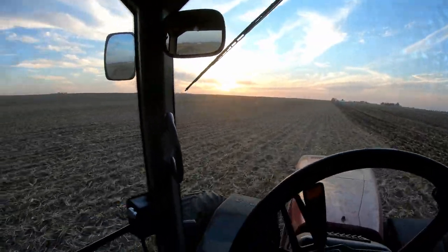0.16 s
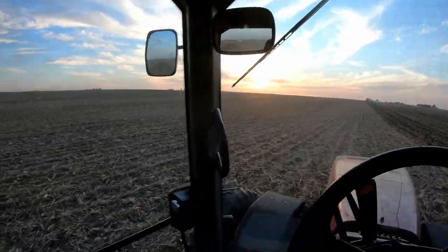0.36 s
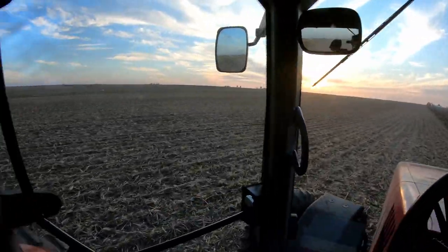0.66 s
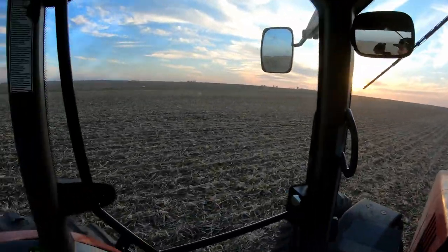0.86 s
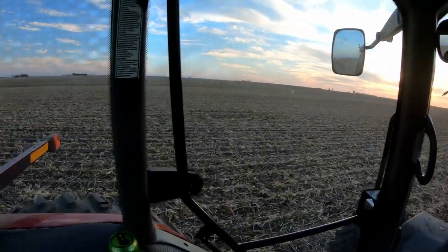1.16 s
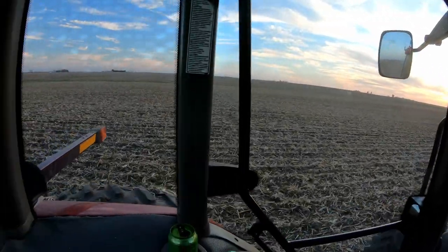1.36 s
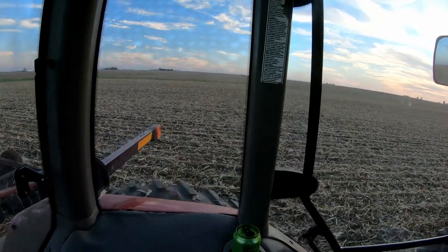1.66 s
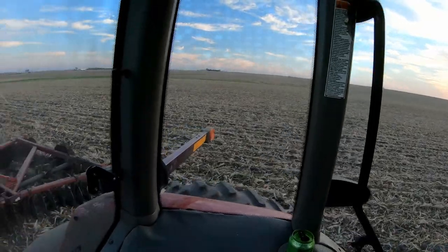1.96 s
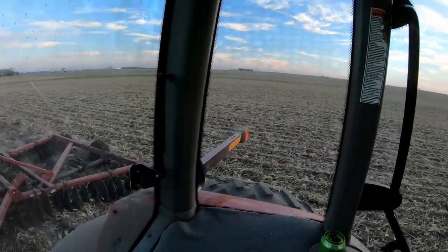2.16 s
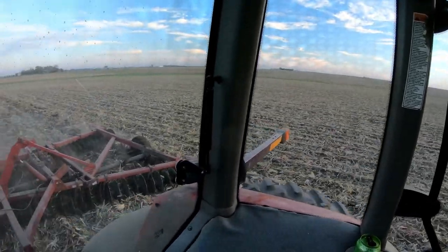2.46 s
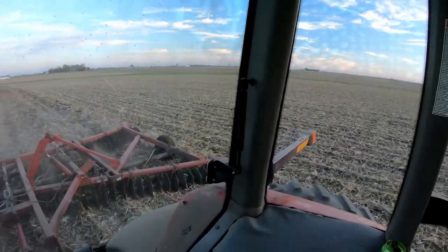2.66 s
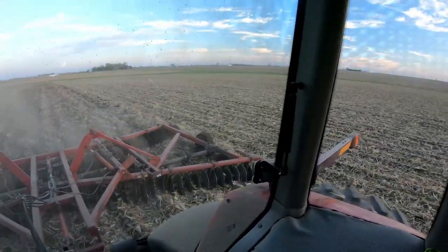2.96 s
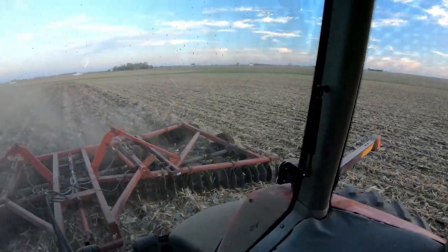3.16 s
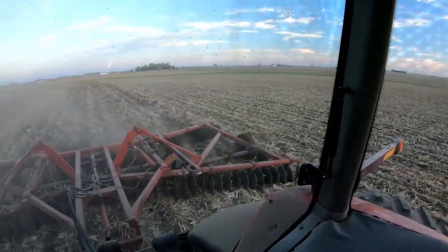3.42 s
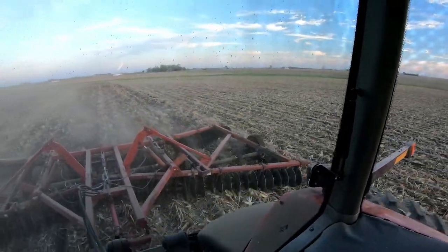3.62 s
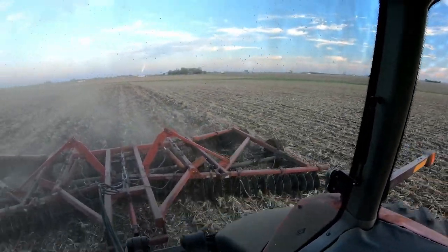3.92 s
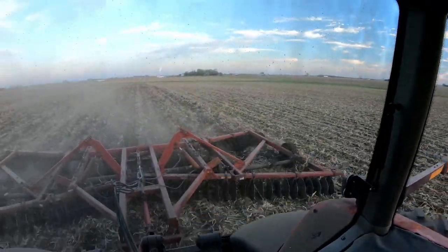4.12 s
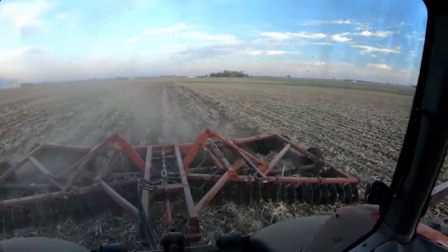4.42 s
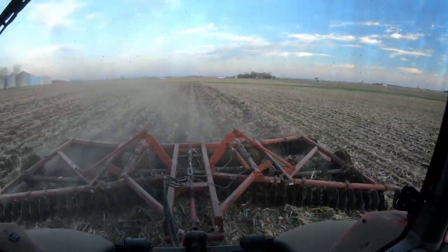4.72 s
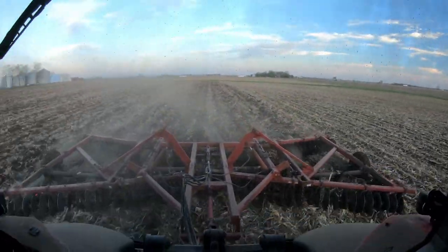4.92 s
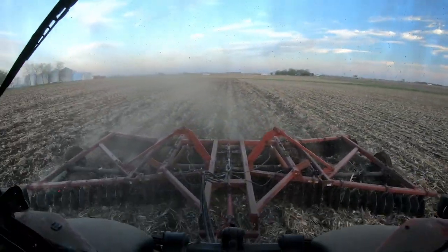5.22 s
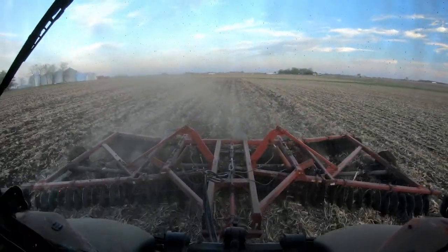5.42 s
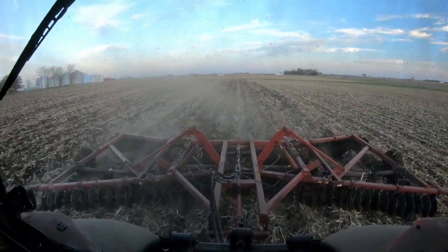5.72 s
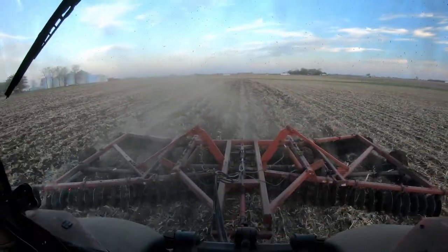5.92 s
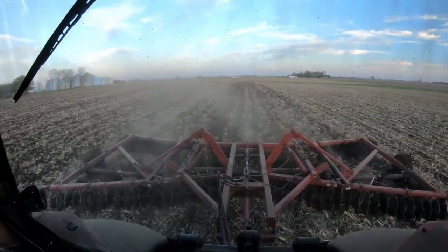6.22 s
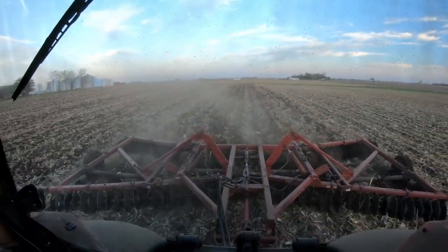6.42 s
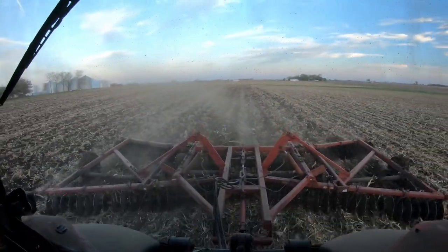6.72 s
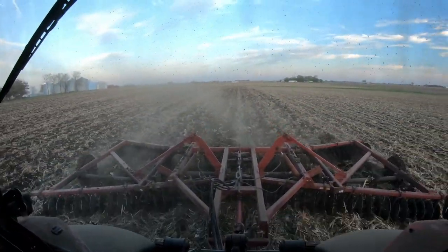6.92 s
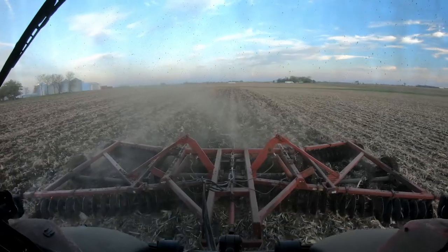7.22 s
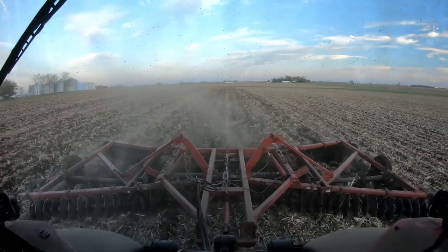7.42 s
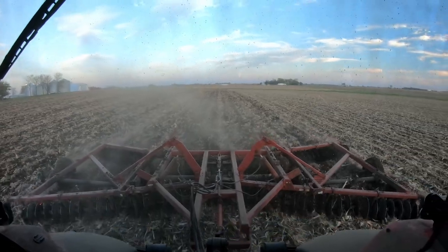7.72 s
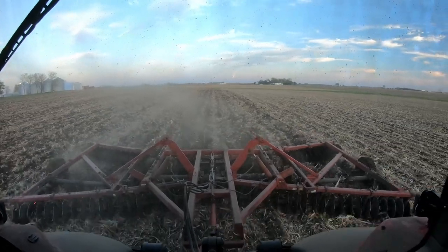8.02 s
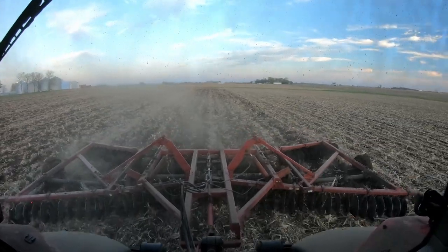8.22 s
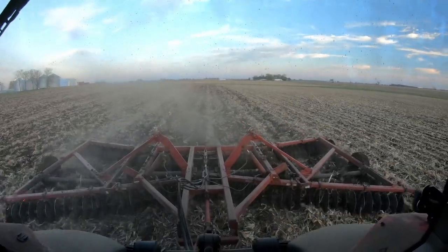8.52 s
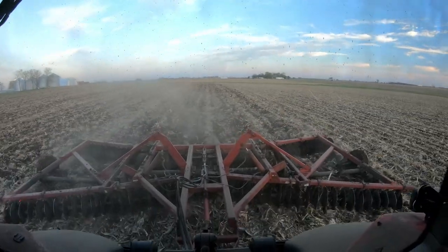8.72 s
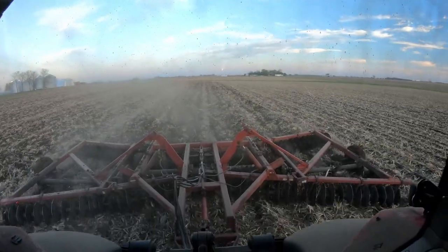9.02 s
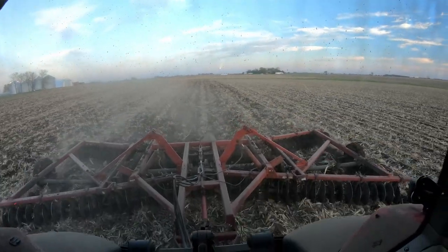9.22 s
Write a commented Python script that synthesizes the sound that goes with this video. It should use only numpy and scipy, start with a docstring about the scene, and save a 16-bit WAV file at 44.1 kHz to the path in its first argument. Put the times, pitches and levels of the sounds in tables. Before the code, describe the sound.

Inside a closed tractor cab, a diesel engine drones at steady speed while pulling a harrow over rough ground. Gears whine above muffled clatter and a low rumble. A loose fitting clacks sharply twice early on and once more later. The deep boom swells as the microphone turns from the windscreen to the rear window, with a faint hiss of dust and tiny ticks of chaff on the glass.

```python
"""Inside the closed cab of a six-cylinder diesel tractor pulling a disk harrow at steady speed. Periodic firing
drives the cab air into a deep boom, which swells as the microphone moves from the windscreen toward the rear
window. Meshing gears whine over muffled diesel clatter, and rough ground shakes the frame into a rumble. A
loose fitting clacks now and then, dust and chaff hiss and tick on the glass, and the turbocharger whistles
faintly."""
import sys
import numpy as np
from scipy import signal
from scipy.fft import rfft, irfft, next_fast_len
from scipy.io import wavfile

SR = 44100
rng = np.random.default_rng(int(sys.argv[2]) if len(sys.argv) > 2 else 0)


def materialize(psi):
    """Save the field psi as 16-bit PCM at rate SR to the path in sys.argv[1].

    A 1-D psi becomes a single channel; in a 2-D psi each row is a channel.
    """
    bounded = np.clip(np.atleast_2d(psi).T, -1, 1)
    quanta = np.round(bounded * 32767).astype(np.int16)
    wavfile.write(sys.argv[1], SR, quanta)


N = 413216
CYLINDERS = 6  # firings per four-stroke cycle


def from_db(db):
    """Level in decibels as an amplitude ratio."""
    return 10 ** (np.asarray(db) / 20)


def rms_one(x):
    """Normalisation to unit rms."""
    return x / np.sqrt(np.mean(x ** 2) + 1e-20)


def in_time(curve):
    """Linear interpolation of (t/s, value) rows at every sample."""
    times, values = np.transpose(curve)
    return np.interp(np.arange(N) / SR, times, values)


def coloured(x, spectrum):
    """Spectral shaping by (f/Hz, level/dB) rows, rolling off beyond their ends; rms 1."""
    size = next_fast_len(N, real=True)
    hz, db = np.transpose(spectrum)
    log_f = np.log(np.maximum(np.fft.rfftfreq(size, 1 / SR), 1))
    gain = from_db(np.interp(log_f, np.log(hz), db))
    beyond = np.abs(log_f - np.clip(log_f, np.log(hz[0]), np.log(hz[-1])))
    return rms_one(irfft(rfft(x, size) * gain * np.exp(-2 * beyond), size)[:N])


def drift(rate_hz):
    """Slow random fluctuation: noise low-passed at rate_hz; rms 1."""
    step, run_in = 40, 2000
    r = np.exp(-2 * np.pi * step * abs(rate_hz) / SR)
    noise = rng.standard_normal(N // step + run_in + 2)
    slow = signal.lfilter([1], [1, -2 * r, r * r], noise)[run_in:]
    return np.interp(np.arange(N) / step, np.arange(len(slow)), rms_one(slow))


def tone(turns):
    """Simple harmonic motion of rms 1, cresting on every whole turn."""
    return np.sqrt(2) * np.cos(2 * np.pi * turns)


def fluttering(turns, depth, rate_hz):
    """Random amplitude and phase modulation: depth 0 is a pure tone, 1 narrow-band noise; rms 1."""
    angle = 2 * np.pi * turns
    in_phase = np.sqrt(2 - 2 * depth ** 2) + depth * drift(rate_hz)
    quadrature = depth * drift(rate_hz)
    return in_phase * np.cos(angle) + quadrature * np.sin(angle)


def ring(force, hz, t60):
    """Damped oscillator: a unit impulse starts a unit sine that falls 60 dB in t60 seconds."""
    r, w = 10 ** (-3 / (t60 * SR)), 2 * np.pi * hz / SR
    return signal.lfilter([0, np.sin(w)], [1, -2 * r * np.cos(w), r * r], force + 1e-18)


def resonance(force, hz, width_hz):
    """Forced response of one mode, whose decay time is inverse to its bandwidth; rms 1."""
    return rms_one(ring(force, hz, t60=np.log(1000) / (np.pi * width_hz)))


def boom(firings, place):
    """Standing waves: the firing tone and its octave fill the cab; the microphone moves through them."""
    # tones from unequal cylinders: multiple of the four-stroke cycle rate, level/dB
    engine_orders = [(2, -43.5), (9, -56), (10, -45.5), (14, -47), (18, -55.5), (20, -56.5), (22, -57.5),
                     (24, -49), (30, -64), (32, -65.5), (34, -59.5), (48, -55)]
    full_place, first_node, node_spacing = 0.47, 0.27, 0.76  # 0 windscreen, 1 rear window
    front_loss_db = 10.5 * np.clip(1 - place / full_place, 0, 1)
    mode_shape = np.hypot(np.sin(np.pi * (place - first_node) / node_spacing), .2)  # nodes leak a little
    fundamental = from_db(-13.5 - front_loss_db + 0.1 * drift(2.6)) * tone(firings)
    octave = mode_shape * from_db(-24.5 - 0.77 * front_loss_db + 0.24 * drift(2.1)) * tone(2 * firings)
    cycles = firings / CYLINDERS
    uneven = sum(from_db(db) * fluttering(order * cycles, depth=0.35, rate_hz=2.3)
                 for order, db in engine_orders)
    return fundamental + octave + uneven


def chassis(front):
    """Structure-borne sound: tyres and disks shake the frame, so the cab shudders and its panels drum."""
    # spectra of the cab on its mounts, the tyres and the panels: f/Hz, relative level/dB
    shudder_spectrum = [(3, -1), (16, 2), (34, -10.5), (45, -17.5)]
    rumble_spectrum = [(30, -60.5), (50, -62), (62, -63), (90, -61), (150, -52.5), (200, -58.5),
                       (240, -60.5), (300, -58), (365, -65.5), (460, -62), (560, -71), (900, -80)]
    panel_spectrum = [(70, -32.5), (88, -5.5), (100, 2.5), (114, 1.5), (130, -10.5), (170, -28)]
    # strength of the drumming: t/s, relative level/dB
    panel_level = [(0.0, -34), (2.2, -36.5), (2.4, -31.6), (3.7, -34), (4.0, -26), (4.6, -37), (5.0, -28.5),
                   (7.6, -29), (7.8, -32), (9.35, -27)]
    shudder = from_db(-27 + 2 * front) * coloured(rng.standard_normal(N), shudder_spectrum)
    rumble = from_db(-34) * coloured(rng.standard_normal(N), rumble_spectrum)
    drumming = from_db(in_time(panel_level) + 1) * coloured(rng.standard_normal(N), panel_spectrum)
    return shudder + rumble + drumming


def gears(firings, front):
    """Periodic meshing: pump and gear teeth give fluttering tones proportional to crankshaft speed."""
    # swells of the pump and the upper gear: t/s, relative level/dB
    pump_level = [(0, -42.8), (0.5, -47.5), (0.85, -41.5), (2, -40.5), (2.9, -51.5), (4.3, -42.5),
                  (5.1, -46), (6.8, -42.0), (7.8, -47), (8.7, -40.5), (9.37, -44.5)]
    upper_level = [(0, -58), (2, -53.5), (2.6, -59.5), (3.1, -52), (3.6, -53.5), (4.2, -62.5), (6.7, -61),
                   (7.4, -54.5), (8.1, -59), (9.37, -61)]
    # lesser shaft and gear tones: f/Hz at rated speed, relative level/dB, flutter depth (0-1)
    whines = [(34.6, -40, .4), (302, -51, .8), (1003, -64, .6), (1316, -59.5, .35), (1428, -64, .8),
              (1456, -64, .6), (1863, -65, .55), (2110, -64, .55), (2630, -68, .45)]
    firing_hz, pump_hz, lower_hz, upper_hz = 84, 486, 1057, 1148  # at rated speed
    rated_s = firings / firing_hz  # a clock that keeps pace with the crankshaft
    lower_db = -53.5 + 2 * front + drift(0.74)
    pump = from_db(in_time(pump_level) + 0.4) * fluttering(rated_s * pump_hz, depth=0.79, rate_hz=11)
    lower = from_db(lower_db) * fluttering(rated_s * lower_hz, depth=.5, rate_hz=7)
    upper = from_db(in_time(upper_level) + 4) * fluttering(rated_s * upper_hz, depth=.45, rate_hz=11)
    lesser = sum(from_db(db + 1.5 + 0.4 * drift(.8)) * fluttering(rated_s * hz, depth, rate_hz=6)
                 for hz, db, depth in whines)
    return pump + lower + upper + lesser


def clatter(firings, front):
    """Transmission and resonance: the firewall muffles combustion and valve noise; the dashboard buzzes."""
    # engine noise behind the firewall: f/Hz, relative level/dB
    muffled_spectrum = [(350, -7.5), (650, 10.5), (900, 4.5), (1200, 5), (1430, 2.5), (1600, 1),
                        (2050, 0.5), (2500, -0.5), (3000, -2.5), (3400, -5), (4000, -10.5), (5500, -14),
                        (7000, -18.5), (12000, -38)]
    # dashboard resonances: f/Hz, bandwidth/Hz, relative level/dB
    dashboard_modes = [(1004, 280, 0.5), (1433, 150, 0), (1666, 59, -3.5), (1877, 42, -6.5), (2226, 73, -6),
                       (2447, 130, -1.5), (2540, 76, -2.5), (2850, 90, -12), (3360, 120, -8)]
    cycles = firings / CYLINDERS
    surge = 1 + 0.014 * tone(firings) + 0.04 * tone(cycles) + 0.03 * tone(2 * cycles)
    knocks = rng.standard_normal(N) * surge * from_db(.6 * drift(35))
    firewall = from_db(-44.5) * coloured(knocks, muffled_spectrum)
    buzz = np.zeros(N)
    for hz, width_hz, db in dashboard_modes:
        shaking = rng.standard_normal(N) * surge * from_db(1.5 * drift(3.7))
        buzz += from_db(db) * resonance(shaking, hz, width_hz)
    return firewall + from_db(-52 + 6 * front) * rms_one(buzz)


def engine_bay(firings, front):
    """Direct sound: facing forward, one hears a throaty rush and the third firing harmonic."""
    # noise passed by the windscreen: f/Hz, relative level/dB
    rush_spectrum = [(300, -16.5), (420, 5), (520, 0.5), (650, -10), (980, -6.5), (1350, -9), (1800, -15.5)]
    rush = from_db(-40.5) * coloured(rng.standard_normal(N), rush_spectrum)
    third_harmonic = from_db(-51) * fluttering(3 * firings, depth=.25, rate_hz=3)
    return front * (rush + third_harmonic)


def loose_fitting():
    """Impact excitation: a loose part strikes and chatters, giving a dry crack and ringing modes."""
    # blows: t/s, relative level/dB, favoured f/Hz, chatter time constant/s
    blows = [(.6519, -16, 1900, .009), (.705, -31, 2500, .02), (.7912, -30.5, 2400, .015),
             (1.5733, -19.5, 1900, .008), (6.5146, -23, 2700, .011)]
    # modes of the part: f/Hz, relative level/dB, t60/s
    modes = [(1030, -8, .035), (1450, -9, .035), (1590, -10, .035), (1820, -7, .04), (2100, -10, .035),
             (2420, -9, .035), (2580, -8, .035), (2830, -7, .045), (3130, -13, .035), (3520, -16, .03),
             (4400, -15, .01), (5300, -14, .008), (5950, -15, .012), (7180, -14, .02), (7750, -15, .02)]
    t = np.arange(SR // 5) / SR
    crack_band = signal.butter(2, [900, 3300], "band", fs=SR, output="sos")
    clacks = np.zeros(N)
    for start_s, db, favoured_hz, chatter_s in blows:
        force = rng.standard_normal(len(t)) * np.exp(-t / chatter_s)
        force *= 3.1 / np.linalg.norm(force)
        force[0] += .5  # first contact
        clack = from_db(13) * signal.sosfilt(crack_band, force)
        for k, (hz, mode_db, t60) in enumerate(modes):
            octaves_off = abs(np.log2(hz / favoured_hz))
            clack += (-1) ** k * from_db(mode_db - 5 * octaves_off) * ring(force, hz, t60)
        clacks[round(start_s * SR):][:len(t)] += from_db(db - 12) * clack
    # plastic yields a little, so the highest frequencies stay weak
    return signal.sosfilt(signal.butter(2, 9000, fs=SR, output="sos"), clacks)


def rear_panel(place):
    """Near field: a shaken rear panel resonates in one narrow band, heard only close by."""
    level_db = -49.5 - 57 * np.abs(1 - place)
    return from_db(level_db) * resonance(rng.standard_normal(N), hz=1432, width_hz=110)


def dust(grains_per_s=60, decay_s=0.0019):
    """Shot noise: countless fine impacts on the glass merge into a hiss, with coarser grains among them."""
    # strength of the hiss: t/s, relative level/dB
    hiss_level = [(0.0, -69.8), (1.0, -64), (1.2, -66.5), (2.5, -60.8), (5.1, -64), (7.8, -64),
                  (8.0, -61.8), (8.4, -64), (9.35, -63)]
    # its spectrum: f/Hz, relative level/dB
    hiss_spectrum = [(3000, -14.5), (7000, -1.5), (9000, 2.5), (12500, 0), (14000, -4), (15700, -10.5)]
    flurries_db = .55 * drift(7)
    sizes = from_db(3.5 * np.minimum(rng.exponential(1, N), 3))
    grains = (rng.random(N) < grains_per_s / SR) * sizes
    envelope = signal.lfilter([1], [1, -np.exp(-1 / (decay_s * SR))], grains + 1e-18)
    patter = rms_one(envelope * rng.standard_normal(N))
    hiss = coloured(rng.standard_normal(N) + from_db(-18) * patter, hiss_spectrum)
    return from_db(in_time(hiss_level) + flurries_db + 1.5) * hiss


def chaff(decay_s=.007):
    """Impact transients: bits of stalk tick on the glass, each a bright, exponentially decaying noise."""
    # impacts: t/s, relative level/dB
    ticks = [(1.0824, -50), (2.0697, -47), (2.4433, -41), (2.7544, -44), (2.9612, -46), (3.1194, -46),
             (3.6277, -47), (4.2194, -48)]
    hits = np.zeros(N)
    for start_s, db in ticks:
        hits[round(start_s * SR)] = from_db(db - 3)
    envelope = signal.lfilter([1], [1, -np.exp(-1 / (decay_s * SR))], hits + 1e-18)
    tick_band = signal.butter(2, [8000, 13000], "band", fs=SR, output="sos")
    return signal.sosfilt(tick_band, envelope * rng.standard_normal(N))


def turbo(front):
    """Blade-passing tone: the compressor whistles thinly, gliding in pitch and swelling at random."""
    # pitch of the whistle: t/s, f/Hz
    pitch = [(0, 8440), (1.3, 8340), (3.6, 8430), (6.8, 8310), (9.37, 8670)]
    whistle = fluttering(np.cumsum(in_time(pitch)) / SR, depth=.85, rate_hz=9)
    return from_db(-78.5 + 3 * front + 2 * drift(4)) * whistle


def scene():
    """Superposition: engine, cab and dust add at a microphone that moves from front to rear."""
    # firing rate of the engine: t/s, f/Hz
    firing_rate = [(0.0, 83.84), (1.2, 84.11), (1.3, 83.67), (2.6, 84.3), (2.7, 83.73), (3.9, 84.47),
                   (4.7, 83.93), (6.1, 84.35), (7.7, 83.22), (8.0, 83.97), (8.4, 83.32), (9.35, 84.31)]
    # path of the microphone: t/s, place (0 windscreen, 1 rear window)
    path = [(0, 0), (.45, 0.056), (.85, .25), (1.4, 0.45), (2, 0.65), (2.8, 0.76), (4.4, .89), (5.8, 0.98),
            (7.5, .88), (9.37, 0.88)]
    hunting_hz = .1 * drift(2)  # the governor hunts a little
    firings = np.cumsum(in_time(firing_rate) + hunting_hz) / SR  # phase, one turn per firing
    place = in_time(path)
    front = np.clip(1 - (place / 0.88) ** 2, 0, 1)  # share of the engine bay heard directly
    engine = boom(firings, place) + gears(firings, front) + clatter(firings, front)
    engine += engine_bay(firings, front) + turbo(front)
    cab = chassis(front) + rear_panel(place) + loose_fitting()
    return (engine + cab + dust() + chaff())[None]


def record(dry, cutoff_hz=15700):
    """Band limiting: a steep low-pass filter removes the highest treble."""
    run_in = 500  # samples for the filter to settle
    padded = np.pad(dry, ((0, 0), (run_in, 0)), mode="reflect")
    low_pass = signal.ellip(12, .1, 80, cutoff_hz, fs=SR, output="sos")
    return signal.sosfilt(low_pass, padded)[:, run_in:]


dry = scene()
out = record(dry)
materialize(out)
```